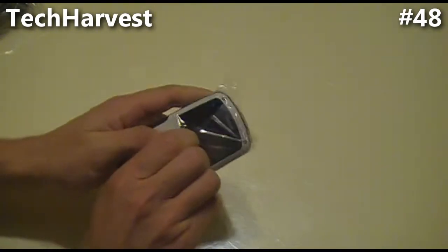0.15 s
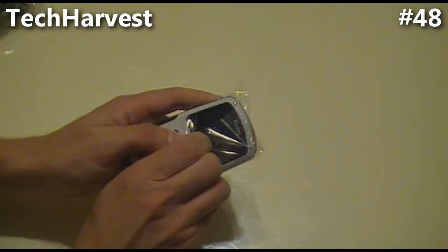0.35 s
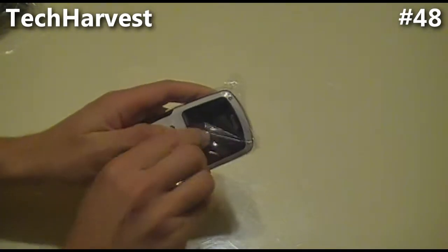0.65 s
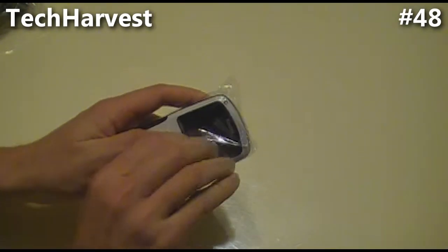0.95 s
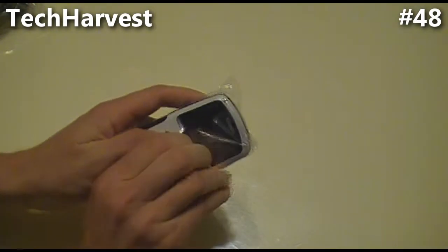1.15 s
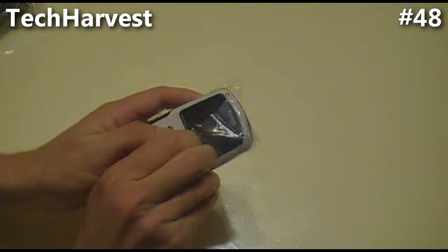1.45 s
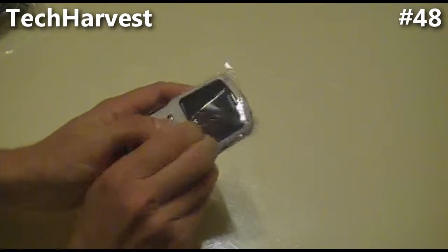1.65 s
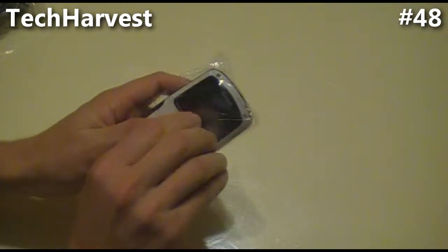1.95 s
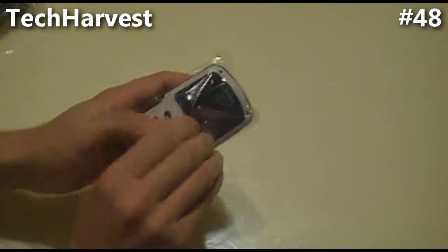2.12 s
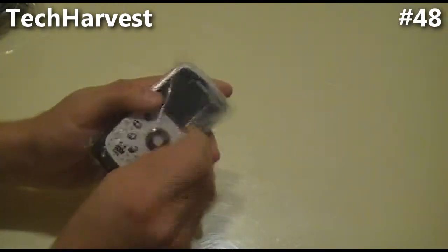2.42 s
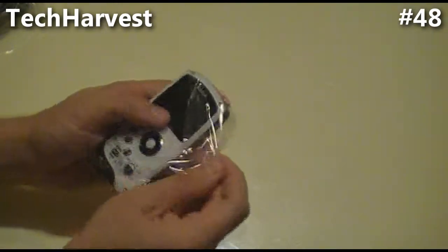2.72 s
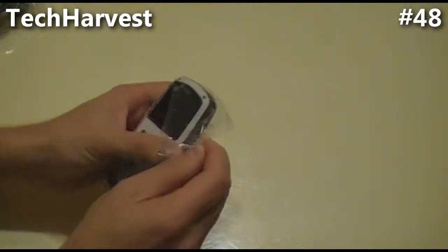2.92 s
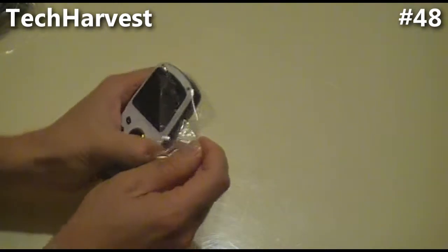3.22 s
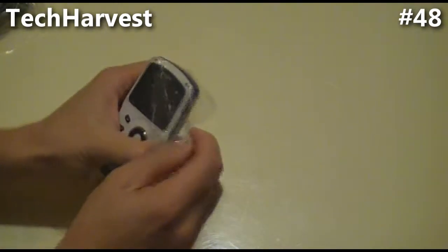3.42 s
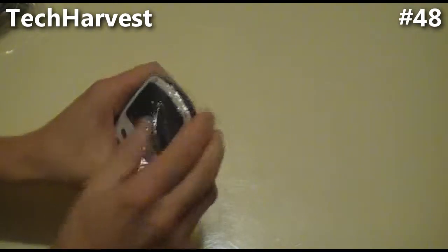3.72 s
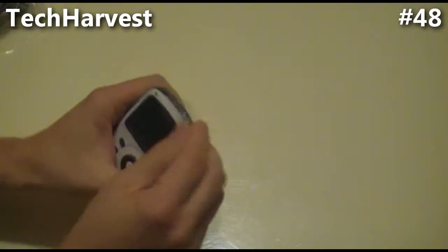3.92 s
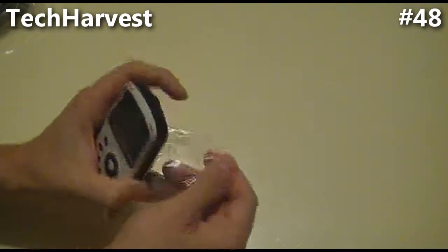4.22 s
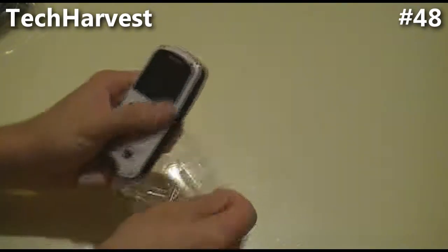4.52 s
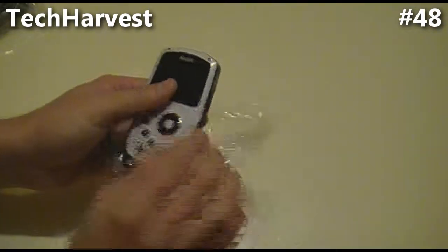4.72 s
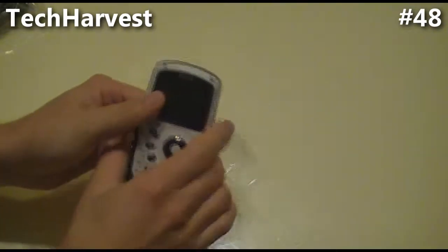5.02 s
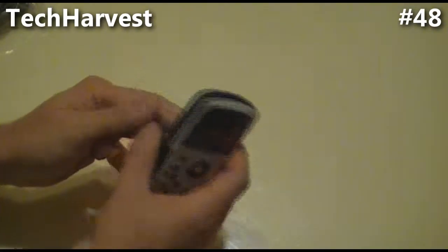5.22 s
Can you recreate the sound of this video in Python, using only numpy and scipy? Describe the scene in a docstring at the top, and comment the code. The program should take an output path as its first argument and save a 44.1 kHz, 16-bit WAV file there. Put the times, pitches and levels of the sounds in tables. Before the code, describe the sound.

Thin, stiff clear film is peeled from a small hollow plastic device, close to a stereo microphone in a quiet room. From 0 to 1.5 seconds there are mostly separate dry ticks and snaps, one sharp at the very start, over small puffs of fine crackle. Around 1.55 seconds a tight cluster of loud, bright snaps cracks out. Soft finger bumps and dull palm thuds follow from 1.7, with a brittle burst near 1.9 and a case knock around 2.25. Crinkling surges at 2.4 to 2.6, then eases into scattered snaps and light rustling until about 3.8. From 3.9 the film grows busier, densest from 4.2 to 4.75, with a firm hollow knock near 4.55. A further crumple comes around 5.0 to 5.1, and a last few snaps and a bump at 5.3. Soft hiss, low rumble and faint wavering hum sit underneath; echoes are slight.

```python
"""Short snaps ring out over a denser fine crackle as fingers peel thin clear film off a small plastic device.
Each snap is a crease of the film buckling: a burst of noise, coloured by the film and by its own pitch.
Fingers bump and rub the hollow case, which rings at its own pitches and thuds in the cupped hands.
Two microphone ports hear it close by, with faint echoes off the table and walls.
Behind it lies a quiet room: soft hiss, rumble and a wavering mains hum."""
import sys
import numpy as np
from scipy import signal
from scipy.fft import rfft, irfft, next_fast_len
from scipy.io import wavfile
from scipy.ndimage import uniform_filter1d, map_coordinates

SR = 44100
rng = np.random.default_rng(int(sys.argv[2]) if len(sys.argv) > 2 else 0)


def dump_mix(stems):
    """Bounce the given channels to the path in sys.argv[1] as a 16-bit WAV at rate SR."""
    frames = np.atleast_2d(stems).T  # one column per channel
    limited = np.clip(frames, -1, 1)  # hard clip at full scale
    pcm = np.round(limited * 32767).astype(np.int16)
    wavfile.write(sys.argv[1], SR, pcm)


N = 236287

FAVOUR_DB = 7  # every crease favours its own pitch by this much


def amp(db):
    """Gain of a level in dB."""
    return 10 ** (np.asarray(db) / 20)


def unit(x):
    """x scaled to an rms of 1."""
    return x / np.sqrt(np.mean(x ** 2) + 1e-20)


def along(points, hz):
    """Read a curve of (Hz, value) points, spaced on a log pitch axis."""
    point_hz, value = np.transpose(points)
    return np.interp(np.log(hz + 1), np.log(point_hz + 1), value)


def wobble(rate):
    """A smooth random curve through `rate` random knots a second."""
    knots = rng.standard_normal(int(N * rate / SR) + 4)
    return map_coordinates(knots, [np.arange(N) * rate / SR])


def filtered(x, response):
    """x times a complex response of frequency."""
    size = next_fast_len(N + SR // 2)
    hz = np.fft.rfftfreq(size, 1 / SR)
    return irfft(rfft(x, size) * response(hz), size)[..., :N]


def ringing(x, modes):
    """x through resonances (pitch Hz, width Hz, level dB); every second one is flipped in sign."""
    def response(hz):
        total = 0
        for k, (centre, width, db) in enumerate(modes):
            damping = 1j * hz * width
            total = total + (-1) ** k * amp(db) * damping / (centre ** 2 - hz ** 2 + damping)
        return total
    return filtered(x, response)


def placed(rows, start_s):
    """Short sounds, one a row, summed at their start times."""
    first = np.round(np.asarray(start_s) * SR).astype(int)
    at = first[:, None] + np.arange(rows.shape[1])
    return np.bincount(at.clip(0).ravel(), rows.ravel(), N + SR)[:N]


def puffs(t60_s, rise_s, size, spike):
    """One row of noise for each t60: a very short rise, a sharp crack, then a dying tail."""
    t = (np.arange(size) - size // 4) / SR  # zero is the moment of the crack
    rise = np.exp(t.clip(None, 0) / rise_s)
    fall = amp(-60 * t.clip(0) / t60_s[:, None])
    crack = spike * amp(-60 * np.abs(t) / 0.0019)
    return rng.standard_normal((len(t60_s), size)) * rise * (fall + crack)


def buckles(crack_s, t60_s, uneven_db, size, pitch_hz):
    """Treble and middle of each buckling crease, both at peak 1, with start times; bands vary by crease."""
    # colour of the film: pitch_hz [Hz], level_db [dB, relative]
    film_colour = [(290, -65), (500, -9.5), (994, -6.5), (1190, -11), (2040, -7.5), (2650, -11),
                   (3210, -8.5), (4290, -9), (6860, 6), (7710, 9), (8420, 9), (9890, 5), (14900, -17),
                   (16500, -20)]
    split_hz, favour_octaves = 4500, 0.22
    hz = np.fft.rfftfreq(size, 1 / SR)
    bumpy = uniform_filter1d(rng.standard_normal((len(crack_s), len(hz))), size // 24, 1)
    bias = unit(bumpy) * hz / (hz + 1500)  # less uneven in the bass
    octaves_off = np.log2((hz + 1) / pitch_hz[:, None])
    favour = FAVOUR_DB * np.exp(-(octaves_off / favour_octaves) ** 2 / 2)
    noise = rfft(puffs(t60_s, .0007, size, spike=1.1))
    crease = noise * amp(along(film_colour, hz) + uneven_db * bias + favour)
    high = 1 / (1 + (split_hz / (hz + 1)) ** 8)
    thin = 1 / (1 + (900 / (hz + 1)) ** 3)  # a small crease moves little air in the bass
    parts = irfft([crease * high, crease * (1 - high) * thin])
    parts = parts / np.abs(parts).max(2, keepdims=True)
    return parts, crack_s - size // 4 / SR


def snaps():
    """Creases that stand out one by one: the film buckles at each listed moment."""
    # buckling creases: crack_s [s], treble_db [dB, peak], middle_db [dB against the treble],
    # t60_ms [ms], pitch_hz [Hz, favoured pitch]
    creases = [(0.0168, -40.5, 15.5, 7.6, 3420), (0.0295, -27, -7, 7.2, 3200),
               (0.0446, -9, -11.5, 7.2, 3040), (0.07, -28, -8, 7.5, 3290.0),
               (0.0943, -25.5, 0.5, 15.0, 1570), (0.1179, -18, -7, 7.4, 3320.0),
               (0.125, -27.5, 3.5, 7.8, 1490), (0.1533, -26, -22, 11, 1980.0), (0.1662, -25, 3, 6, 1050),
               (0.214, -27, 2.5, 7.3, 3290.0), (0.2314, -36.5, 11, 6.3, 3190.0),
               (0.2627, -28, -3, 5.3, 3080.0), (0.2664, -40.5, 5.5, 9, 1400), (0.3018, -28.5, 2, 15, 2110),
               (0.3176, -15.5, -14, 9.6, 2070.0), (0.3509, -23, -10.5, 7.1, 3300),
               (0.372, -28, -9, 8.2, 4400), (0.3975, -24, -12, 17, 4140), (0.4443, -28.5, -3.5, 7.6, 990.0),
               (0.503, -29, -3, 9.7, 3150), (0.5093, -18.5, -11.5, 9, 3400), (0.516, -32.5, 2, 6.8, 700),
               (0.591, -32, 2.5, 6, 3000), (0.5999, -18, -11.5, 2.7, 3400), (0.616, -31, 6.5, 17, 980),
               (0.6405, -24.5, -12, 8.0, 3660.0), (0.706, -22, -8.5, 9.8, 1940.0),
               (0.7096, -14.5, -25, 3.4, 2150.0), (0.7229, -25, -8, 18, 2050),
               (0.747, -29, -22, 3.0, 3510.0), (0.7873, -34.5, 1.5, 4, 3120), (0.8114, -27, -8, 14, 3250.0),
               (0.833, -30, -9, 6, 1890.0), (0.85, -18.5, -18, 11, 3270.0), (0.8711, -15.5, -15, 4.3, 3180),
               (0.9068, -24, -14, 14, 4160.0), (0.9368, -15, -5.5, 2.9, 1940),
               (0.9792, -20.5, -6.5, 8.7, 3100), (0.9914, -24, 6.5, 16, 2920),
               (1.0039, -23, -10, 7.0, 3230), (1.0471, -29, -7, 2.9, 3230.0), (1.068, -30, -5, 4.0, 1940.0),
               (1.1026, -27, -15.0, 5.0, 2560.0), (1.114, -23.5, -5.5, 7.1, 2100),
               (1.1207, -23.5, -6, 10, 2000.0), (1.1446, -30, -6, 5.5, 900.0),
               (1.1573, -25.5, -9, 7.1, 3140.0), (1.185, -24.5, -1, 2.5, 1870.0),
               (1.2684, -22, -5, 4.7, 2180), (1.2832, -23, -4, 2.1, 3670), (1.3426, -20.5, -8.5, 13, 3700),
               (1.4076, -24.5, -7.5, 9.5, 1870.0), (1.4229, -20.5, -14, 12, 3230.0),
               (1.4648, -32, 0, 24, 2830), (1.548, -15, -4, 2.5, 3450.0), (1.5508, -7.5, -9, 6.6, 3340),
               (1.5543, -7, -13, 3.3, 3470.0), (1.556, -6.5, -4, 4, 3640), (1.6277, -34, 0, 9.1, 2050.0),
               (1.6447, -26.5, -4.5, 10.0, 1930), (1.6545, -27, -7, 9.2, 2000.0),
               (1.679, -15.5, -8.5, 15, 1960), (1.7248, -23, -4.5, 9.0, 2050.0),
               (1.7373, -33, -6, 8.6, 1030.0), (1.7544, -18.0, -39, 4.6, 1840),
               (1.7708, -23.5, -9.0, 7, 3100), (1.803, -21.5, -8.5, 11, 2180),
               (1.8292, -22.5, -7, 16, 2930.0), (1.8376, -17, -28, 9.8, 900.0),
               (1.8765, -22, -27, 2.2, 950.0), (1.882, -12, -22, 1.5, 930.0), (1.909, -16, -18, 3, 900.0),
               (1.98, -22, -3, 2.2, 2110.0), (2.0031, -25, -1, 2.6, 4600), (2.0558, -24.5, -8, 2.8, 3060),
               (2.0831, -25, -21, 1.9, 2150.0), (2.1617, -27.5, 1.5, 2.2, 2780),
               (2.221, -18.5, -26, 17, 900.0), (2.2649, -21, 0.5, 21, 1830.0), (2.381, -23, 2, 15, 2190),
               (2.3834, -16.5, -15, 10.0, 1830.0), (2.3873, -17, -10, 3.2, 2130.0),
               (2.412, -18, -14, 17, 4070), (2.4302, -17, -4, 5, 2500), (2.455, -18, -9, 5, 2150),
               (2.5066, -13, -14, 8.7, 1960), (2.529, -23, -6, 8, 2510), (2.541, -13, -13, 14, 1900),
               (2.563, -10, -8, 11, 2230), (2.5717, -11, -7, 10, 2300), (2.578, -11, -8.5, 4.5, 3220),
               (2.5845, -18, -4, 10, 2400), (2.5975, -16, -6, 11, 2000), (2.603, -16, -12, 5.5, 2400),
               (2.617, -21, 1, 6.7, 850), (2.6238, -27, -1, 6.1, 800), (2.629, -20, -1, 5.1, 2330.0),
               (2.6836, -13.5, -9.5, 8.3, 1970), (2.721, -20, -3, 17, 1890),
               (2.7307, -18, -13, 6.4, 2280.0), (2.7524, -21.0, -13, 4.6, 1820),
               (2.769, -20.5, 2.5, 28, 1920), (2.784, -20, -10, 9.0, 1960.0),
               (2.8094, -27, -13, 11, 2200.0), (2.8537, -21, -15, 4.3, 1810.0),
               (2.8987, -21.5, -18, 6.0, 900.0), (2.9303, -24, -3, 3, 3170.0),
               (2.949, -27, -12, 4.5, 3140.0), (2.9677, -22, -5, 5.2, 3400),
               (2.9857, -25.0, -5, 14.0, 2020.0), (3.057, -24, 4, 3.6, 3160), (3.0615, -26, 6, 8.6, 1230),
               (3.064, -19.5, -25.0, 20, 3340.0), (3.109, -25, 1, 16, 3380), (3.1289, -11, -11, 4, 3300),
               (3.1328, -23.5, 3, 18, 3500), (3.153, -25.5, 1.5, 31, 3500), (3.2104, -15, -8.5, 14, 3360),
               (3.219, -18, -3.5, 17, 905), (3.24, -25.5, -19, 8, 2000), (3.2541, -26, -9, 7.0, 3300),
               (3.2782, -18.5, -35, 7.8, 2130.0), (3.3284, -29, 0, 13, 1800), (3.3599, -22, -6, 25, 960),
               (3.379, -29.5, 0, 4.4, 3450.0), (3.3905, -24.5, -2, 17, 1210),
               (3.421, -29.5, -6, 5.9, 970.0), (3.4536, -16, -21, 3.3, 3400.0),
               (3.46, -24.5, 1.5, 9.6, 2930), (3.497, -19, -4, 22, 1550),
               (3.571, -12.5, -14.5, 3.4, 3120.0), (3.5949, -21, -5.5, 10.0, 900.0),
               (3.685, -29, -2.5, 51, 1650), (3.7914, -24.5, -3, 26, 1800), (3.8145, -23, -7.5, 11, 1430),
               (3.878, -16.5, -23, 4.3, 2580.0), (3.9256, -19.5, -2, 26, 3050),
               (3.9354, -13, -10, 4.2, 2900), (3.9671, -10.5, -21, 18, 2330.0),
               (3.976, -16.5, -3, 15, 1810), (4.019, -18.0, -20, 12, 1870.0),
               (4.067, -21, -6, 14.0, 3660.0), (4.0996, -17, -11, 13, 1830.0),
               (4.1155, -18.5, -5, 20, 2670), (4.134, -12, -14.5, 2.4, 894),
               (4.2144, -12, -14, 9.6, 1940.0), (4.229, -19, 4.5, 5.3, 2080),
               (4.2664, -14, -18.0, 13, 3850.0), (4.289, -8.5, -10, 15, 3570),
               (4.2987, -19, -11, 7.0, 3470.0), (4.353, -20, -12, 4.0, 1310.0),
               (4.392, -16, -13.0, 5.8, 2280.0), (4.4027, -17, -6, 7, 3270.0),
               (4.4124, -15.5, -6, 4.0, 3810.0), (4.4359, -17, -10, 6, 2190), (4.461, -15.5, -14, 11, 3730),
               (4.4998, -19, -6, 8.8, 2970), (4.514, -16, -7, 3.5, 4260.0), (4.59, -15, -17, 9.7, 3000),
               (4.6036, -17.5, -3, 4.8, 1610.0), (4.6098, -20, 1.5, 10, 900.0),
               (4.6278, -17.5, -2, 5.6, 3550.0), (4.7239, -18.5, -4, 6, 2330), (4.7378, -24, 1.5, 7, 3170),
               (4.7807, -16, -6, 28, 1130), (4.8257, -21.5, -20, 8.9, 3190.0),
               (4.847, -21, -25, 11, 4200.0), (4.8661, -22, -5.5, 26, 3320.0),
               (4.8906, -24, -38, 10.0, 2950), (4.908, -29, -0.5, 17, 1480), (4.981, -26.0, 3, 5.3, 1590),
               (5.0115, -19, -30, 4.5, 1510.0), (5.098, -15.0, -8, 40, 1140.0),
               (5.1251, -19, -26, 5.0, 1870.0), (5.1372, -14, -30, 5, 1420.0),
               (5.2734, -27, -6, 18.0, 4160.0), (5.2993, -16, -6, 4.3, 1880),
               (5.309, -24, -2.5, 6.5, 900.0), (5.3135, -17, 0, 6.2, 2090.0)]
    crack_s, treble_db, middle_db, t60_ms, pitch_hz = np.transpose(creases)
    (treble, middle), start_s = buckles(crack_s, t60_ms / 1000, uneven_db=1.5, size=1024, pitch_hz=pitch_hz)
    both = treble + amp(middle_db)[:, None] * middle
    return placed(amp(treble_db)[:, None] * both, start_s)


def crackle(treble_gain, middle_gain, count=3500):
    """Many small creases of very unequal size, each with its own pitch and balance, in clumps."""
    when, luck, life, pitch, tilt = rng.random((count, 5)).T
    pitch_hz = 900 * 2 ** (3 * pitch)
    (treble, middle), start_s = buckles(when * N / SR, 0.005 + 0.016 * life, uneven_db=4.5, size=512,
                                        pitch_hz=pitch_hz)
    size_db = np.minimum(-5.5 * np.log(luck + 1e-9), 13)  # few large, many small
    tilt_db = 14 * (tilt - .5)  # some creases are brighter, some duller
    clumps = amp(2.5 * wobble(60))

    def layer(part, tilt_share):
        gain = amp(size_db + tilt_share * tilt_db)[:, None]
        return unit(clumps * placed(gain * part, start_s))

    return treble_gain * layer(treble, 0.61) + middle_gain * layer(middle, -0.82)


def case(rub_gain):
    """Bumps and a lumpy rub ring the hollow case and thud in the palm; soft skin dulls the rub."""
    # fingers on the case: touch_s [s], force_db [dB, peak], t60_ms [ms, contact],
    # palm_db [dB, force into the palm against it], top_hz [Hz, hardness as the top of the force]
    bumps = [(1.706, -24, 220, -11.5, 647), (1.826, -36, 60, 1, 900), (1.853, -27, 130, -8, 700),
             (1.871, -26, 140, -6, 1200), (2.22, -22, 5.9, -15, 900), (2.2389, -15.5, 79, -7, 1820),
             (2.279, -18, 48, -18, 1000), (2.329, -25, 81, -7.5, 600), (2.563, -20.5, 10, -10, 800),
             (3.0985, -26, 11, -12, 1000), (3.11, -28, 54, -1, 1500), (3.133, -27, 140, -3.5, 1500),
             (3.568, -24, 32, -7, 1200), (3.974, -16, 34, -22, 2500), (4.368, -18.5, 12, -10, 1000),
             (4.385, -27, 19, -15, 700), (4.484, -19, 10, -7, 900), (4.512, -18.5, 30, -20, 1500),
             (4.557, -12, 95, -8.5, 3200), (4.606, -20.5, 240, -5.5, 1000), (4.772, -23, 96, -11, 1200),
             (5.307, -14, 50, -22, 2980)]
    # resonances of the hollow case: pitch_hz [Hz], width_hz [Hz], level_db [dB]
    case_modes = [(568, 197, -3), (766, 127, 3), (1110, 560, -4), (1594, 250, -2), (2010, 91, 5.5),
                  (4680, 380, 1)]
    # resonances of the cupped hands: pitch_hz [Hz], width_hz [Hz], level_db [dB]
    palm_modes = [(158, 71, -4.5), (294, 140, -1)]

    lumpy = amp(2.5 * wobble(200)) * rng.standard_normal(N)
    rub = filtered(lumpy, lambda hz: 1 / (1 + 1j * hz / 900) ** 2)  # soft finger pads
    rub = unit(ringing(rub, case_modes) + amp(-12.0) * ringing(rub, palm_modes))

    touch_s, force_db, t60_ms, palm_db, top_hz = np.transpose(bumps)
    size = 8192
    hz = np.fft.rfftfreq(size, 1 / SR)
    touch = puffs(t60_ms / 1000, 0.00019, size, spike=0.79)
    touch = irfft(rfft(touch) / (1 + 1j * hz / top_hz[:, None]) ** 2)
    touch = amp(force_db)[:, None] * touch / np.abs(touch).max(axis=1, keepdims=True)
    start_s = touch_s - size // 4 / SR
    knocks = ringing(placed(touch, start_s), case_modes)
    thuds = ringing(placed(amp(palm_db)[:, None] * touch, start_s), palm_modes)
    return rub_gain * rub + knocks + thuds


def effort():
    """Gains of crackle treble, crackle middle and rub: each move of the fingers sets in, holds and ebbs."""
    # moves of the fingers: start_s [s], length_s [s], treble_db [dB, crackle],
    # middle_db [dB, crackle], rub_db [dB, rub on the case]
    moves = [(0.096, 0.056, -46.5, -47, -74), (0.203, 0.19, -74, -64, -86), (0.5, 0.047, -52, -53, -68),
             (0.61, 0.12, -50, -50, -75), (0.864, 0.061, -51.5, -50.5, -67), (0.995, 0.058, -55, -57, -64),
             (1.113, 0.13, -54, -54, -76), (1.33, 0.06, -49.5, -53.5, -65), (1.547, 0.033, -40.5, -46, -62),
             (1.68, 0.046, -52, -46, -51.5), (1.819, 0.083, -46, -46.5, -49.5),
             (1.888, 0.033, -35.5, -42, -62), (1.966, 0.041, -52, -52, -63), (2.101, 0.15, -46, -48, -64),
             (2.243, 0.026, -44.5, -43, -39), (2.295, 0.063, -58, -60, -44), (2.374, 0.053, -39, -41, -58),
             (2.465, 0.045, -32.5, -36, -50), (2.552, 0.059, -32, -35.5, -43.5),
             (2.71, 0.26, -43.5, -45, -53), (3.045, 0.017, -41, -46.5, -55),
             (3.108, 0.039, -41, -41.5, -50), (3.205, 0.16, -57, -52, -57), (3.468, 0.2, -43, -46, -51),
             (3.795, 0.047, -62, -58, -55), (3.87, 0.13, -38, -39, -48.5), (4.014, 0.13, -38, -42, -52),
             (4.213, 0.084, -31, -36.5, -45.5), (4.375, 0.09, -34.5, -41, -44.5),
             (4.488, 0.043, -30, -35, -57), (4.55, 0.062, -37, -38.5, -37.5),
             (4.639, 0.12, -35, -41.5, -43.5), (4.81, 0.07, -50.5, -51.5, -57.5),
             (4.989, 0.14, -36, -39, -48), (5.179, 0.024, -41, -43.5, -57), (5.275, 0.051, -44.5, -44, -49)]
    # between moves: treble_db [dB, crackle], middle_db [dB, crackle], rub_db [dB]
    rest_db = (-60.5, -68.5, -111)
    attack_s, release_s = 0.0091, 0.02  # for the power to change by a factor e
    t = np.arange(N) / SR
    power = amp(rest_db)[:, None] ** 2 + 0 * t
    for start_s, length_s, *level_db in moves:
        onset = (t - start_s) / attack_s
        ebb = (start_s + length_s - t) / release_s
        shape = np.exp(np.minimum(0, np.minimum(onset, ebb)))
        power = power + amp(level_db)[:, None] ** 2 * shape
    return np.sqrt(power)


def half_angle(likeness, hz):
    """Angle that splits a sound into middle and side so the two ports get this likeness."""
    return np.arccos(np.clip(along(likeness, hz), -1, 1)) / 2


def ports(x):
    """The two ports hear film and case a little differently by pitch, with a random flicker between them."""
    # film and case at the two ports: pitch_hz [Hz], likeness [0 to 1, left against right]
    hands_alike = [(250, 0.54), (600, 0.84), (1400, 0.99), (3100, 1), (7000, 0.88), (15000, 0.75)]
    # head start of the left port: pitch_hz [Hz], lead_rad [radians]
    left_lead = [(3000, .03), (7500, 0.037), (10900, 0.84), (13500, 0.11)]
    knots = 2 * np.pi * rng.random(24)  # random phase along the pitch axis

    def spread(hz):
        skew = np.exp(1j * np.interp(hz, np.linspace(0, SR / 2, len(knots)), knots))
        return np.tan(half_angle(hands_alike, hz)) * skew

    side = filtered(x * np.tanh(3 * wobble(38)), spread)
    side = side + filtered(x, lambda hz: 1j * np.tan(along(left_lead, hz) / 2))
    return np.array([x + side, x - side])


def walls(x):
    """Table and walls answer, mostly alike at both ports; each frequency dies at its own speed."""
    # dying away of the echoes: pitch_hz [Hz], t60_s [s]
    echo_decay = [(300, 0.19), (2000, 0.29), (10000, 0.078)]
    hz, t, noise = signal.stft(rng.standard_normal((2, SR // 2)), SR, nperseg=256)
    dying = noise * amp(-60 * t / along(echo_decay, hz)[:, None])
    shared, own = signal.istft(dying, SR, nperseg=256)[1]
    tail = np.array([shared + 0.31 * own, shared - 0.14 * own]) / np.linalg.norm(shared)
    late = np.pad(x, (130, 0))  # samples of delay before the echoes
    return signal.fftconvolve(late[None], tail, axes=1)[:, :N]


def room():
    """Soft hiss and rumble from filtered noise, almost independent at the two ports, and a wavering mains hum."""
    # colour of the room: pitch_hz [Hz], level_db [dB, relative]
    room_colour = [(15, -40), (30, -19), (80, -3.5), (140, -8), (250, -4), (500, -9.5), (1900, -13),
                   (4000, -18.5), (8000, -67), (16000, -39)]
    # room at the two ports: pitch_hz [Hz], likeness [0 to 1, left against right]
    air_alike = [(60, 0.09), (300, 0.0039), (8000, 0.015)]
    # mains hum: pitch_hz [Hz], level_db [dB rms, before it wavers]
    hum_hz, hum_db = (119, -67)
    room_db = -59  # rms, before it wavers

    def response(hz):
        angle = half_angle(air_alike, hz)
        return amp(along(room_colour, hz)) * [np.cos(angle), np.sin(angle)]

    mid, side = filtered(rng.standard_normal((2, N)), response)
    air = amp(room_db + 0.63 * wobble(3.7)) * unit(np.array([mid + side, mid - side]))
    port_phase = np.array([[.7], [-.7]])  # radians, left and right
    phase = 2 * np.pi * hum_hz * np.arange(N) / SR + .9 * wobble(9) + port_phase
    hum = np.sqrt(2) * amp(hum_db + 1.9 * wobble(32)) * np.sin(phase)
    return air + hum


def scene():
    """Film and case, heard direct and off the walls, over the room."""
    treble_gain, middle_gain, rub_gain = effort()
    hands = snaps() + crackle(treble_gain, middle_gain) + case(rub_gain)
    direct = ports(hands) * amp([[.2], [-.2]])  # left a touch louder
    return direct + amp(-14.0) * walls(hands) + room()


def record(dry):
    """The loudest peaks are rounded off and bent to one side, which adds a low thump; then the band limit."""
    soft = dry / (1 + np.abs(dry / .75) ** 4) ** (1 / 4)
    bent = soft + .12 * soft ** 2
    return filtered(bent, lambda hz: (hz > 15) & (hz < 16200))


dry = scene()
out = record(dry)
dump_mix(out)
```